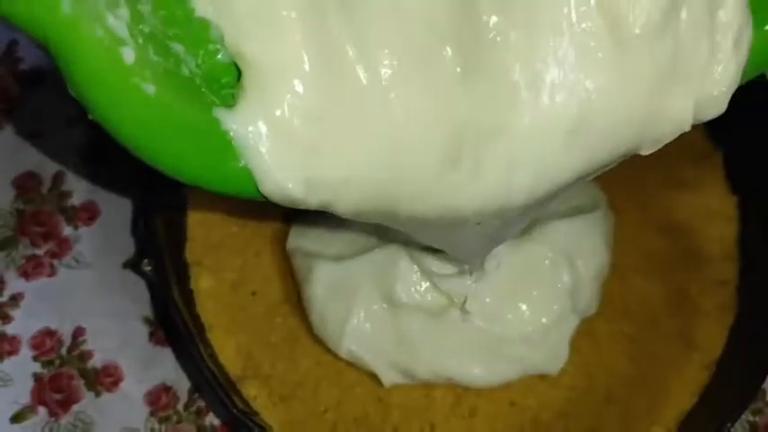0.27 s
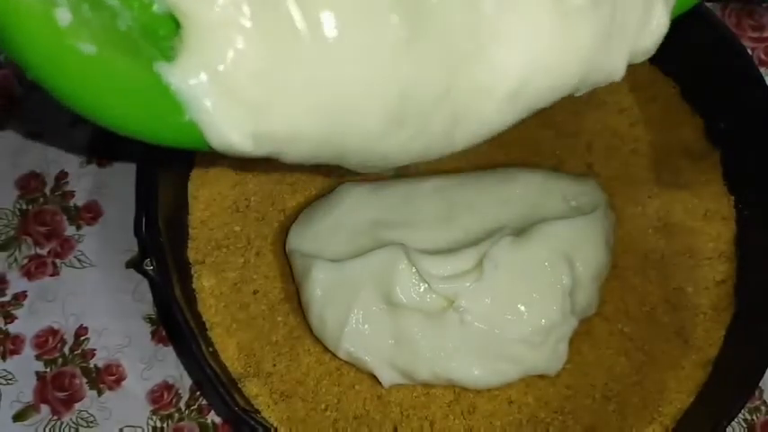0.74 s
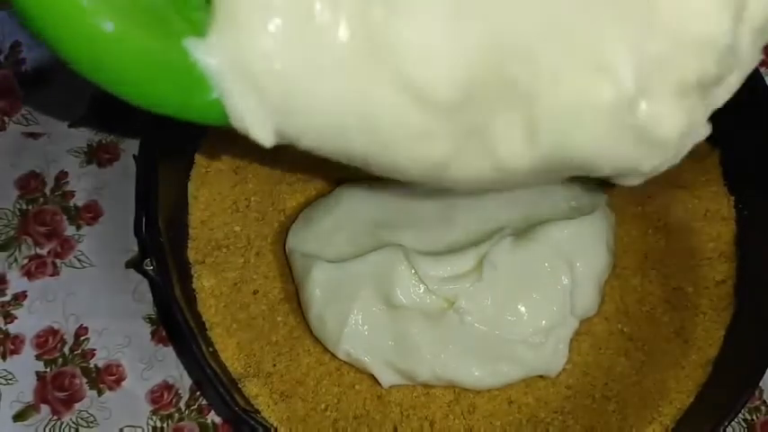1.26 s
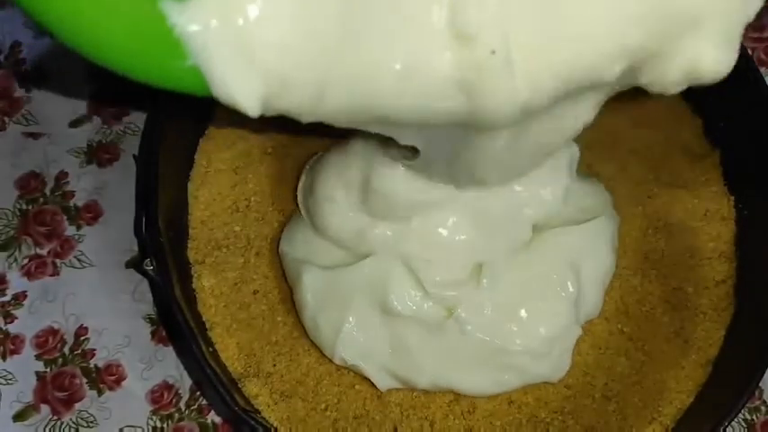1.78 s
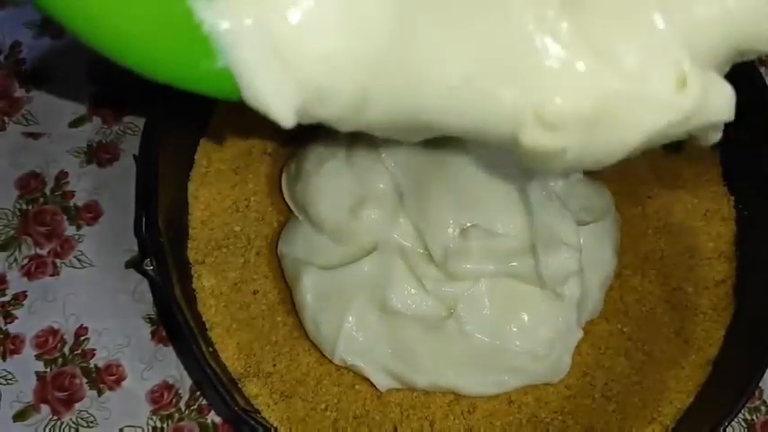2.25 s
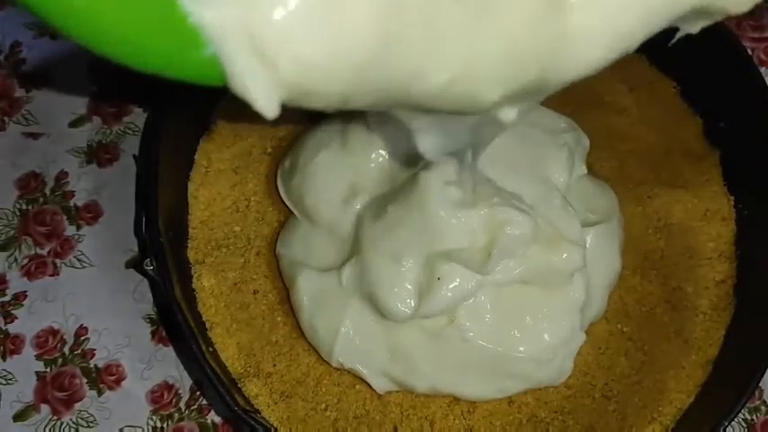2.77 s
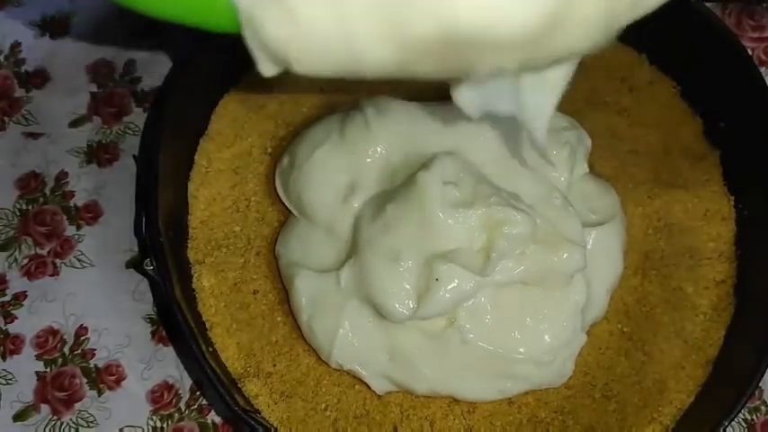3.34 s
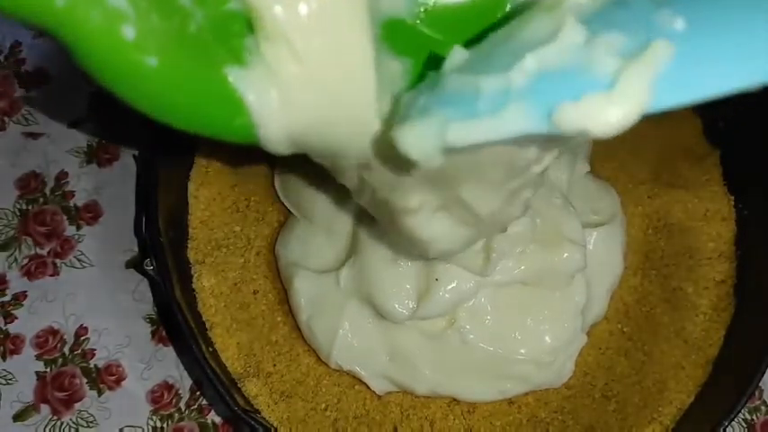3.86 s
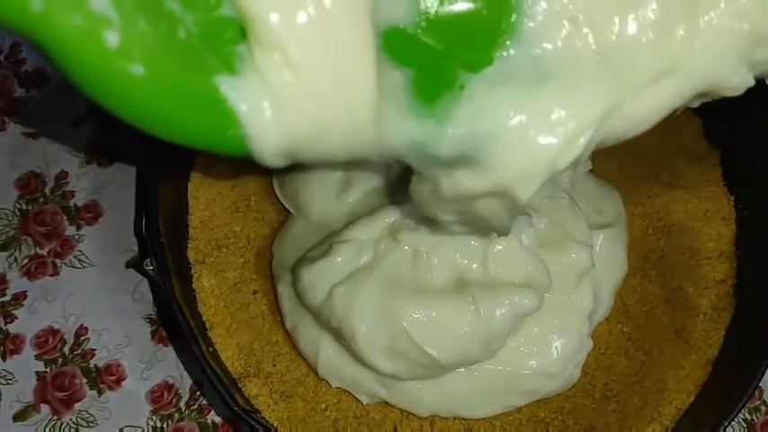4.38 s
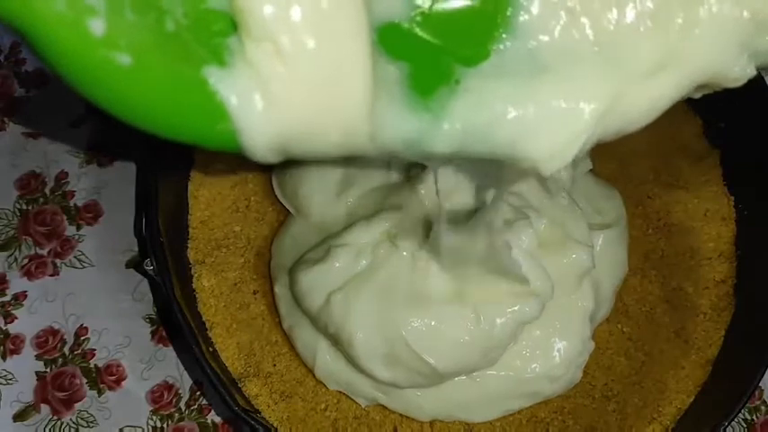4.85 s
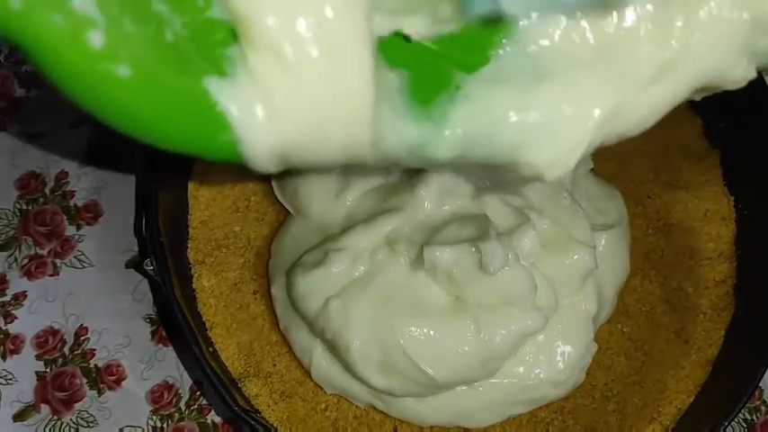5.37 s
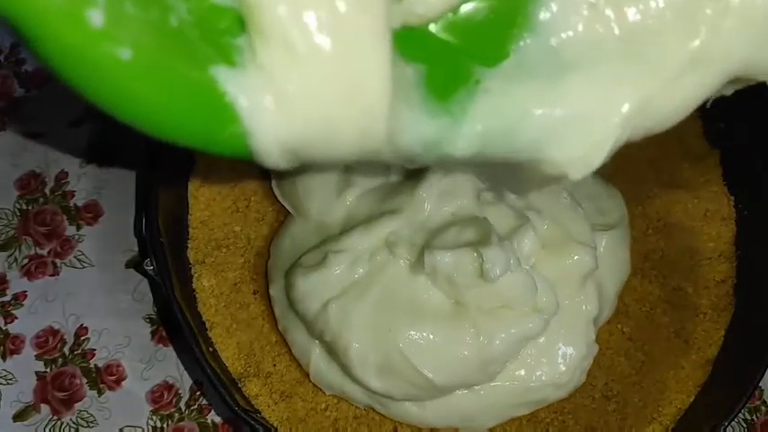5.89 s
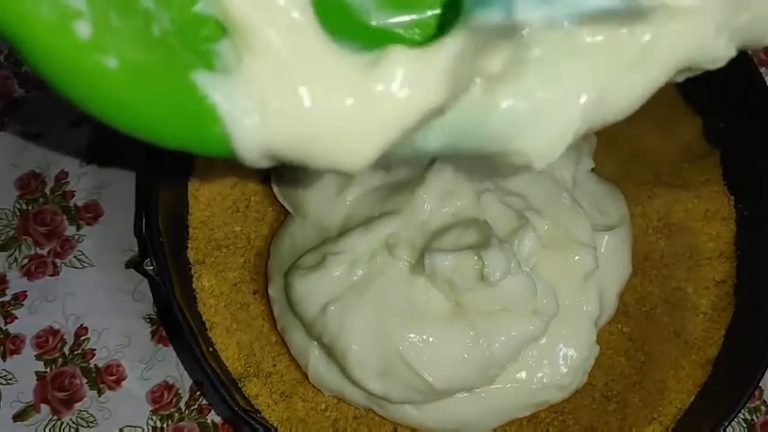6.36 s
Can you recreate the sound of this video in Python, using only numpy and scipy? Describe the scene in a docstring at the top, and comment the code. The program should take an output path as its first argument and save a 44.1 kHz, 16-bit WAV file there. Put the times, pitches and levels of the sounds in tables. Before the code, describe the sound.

Close up in a small, quiet kitchen, thick cream falls into a pan. From 0.1 to 0.9 seconds there is a busy cluster: low and mid hollow pops, wet smacks, soft pan thumps, foam crackle and many crisp, high bubble snaps; a soft bowl knock lands near 0.4. A lull follows, with one small squelch near 1.2. At 1.45 comes the loudest, roundest gloop, then sticky squelching and plops to about 2. More plops and airy squelches come at 2.3 to 2.95, strongest at 2.5. About a second of near quiet follows. A deep plop at 4.0 leads to a dense squelchy cluster at 4.4 to 4.7. Weak soft pops come at 5.2 to 5.6, then a faint knock at 6.2 and a sharp, bright wet snap at 6.5. Dull rubbing, low hum, rumble and a barely audible tick each second lie behind.

```python
"""Thick whipped cream is pushed from a plastic bowl with a silicone spatula and drops into a cake pan.
Close to the microphone, wet smacks and ringing air pockets are pulses over soft resonant pan thumps.
Folding cream squeezes out air as filtered noise and clicks; bubbles and foam are short high rings and crackle.
The spatula rubs and the bowl knocks softly. Behind, a small kitchen hums and rumbles in shaped noise,
and something ticks faintly once a second, like a wall clock."""
import sys
import numpy as np
from scipy import signal
from scipy.io import wavfile

SR = 44100
rng = np.random.default_rng(int(sys.argv[2]) if len(sys.argv) > 2 else 0)


def put_to_file(sound):
    """Save the sound as 16-bit audio at rate SR, in the file named by the first command-line argument."""
    columns = np.atleast_2d(sound).T  # one column per channel
    safe = np.clip(columns, -1, 1)
    whole_steps = np.round(safe * 32767)
    wavfile.write(sys.argv[1], SR, whole_steps.astype(np.int16))


N = 291942

# spectrum of wet hiss from tearing films: f/Hz, level/dB
WET_HISS = [(300, -46), (900, -1), (1200, -8), (1550, 3.5), (2000, -4), (2550, 1), (3400, -5), (4800, -5.5),
            (6300, -2.5), (7500, 5.5), (8700, 4), (9600, -7), (10600, -20.5), (15000, -27.5)]
# spectrum of wet surfaces meeting: f/Hz, level/dB
WET_SMACK = [(200, 11), (900, 4.5), (1200, -8.5), (1520, 3), (2000, -8.5), (2600, -11), (4000, -19.5),
             (8500, -17.5), (11000, -38.5)]


def amp(db):
    """Decibels to gain."""
    return 10 ** (np.asarray(db) / 20)


def unit(x):
    """Scales to an rms of one."""
    return x / np.sqrt(np.mean(x ** 2) + 1e-20)


def read(points, hz):
    """Reads a table of (f/Hz, value) on a log-frequency axis."""
    f, value = np.transpose(points)
    return np.interp(np.log(hz + 1), np.log(f), value)


def follow(curve):
    """Turns a table of (t/s, level/dB) into a gain for every sample."""
    return amp(np.interp(np.arange(N) / SR, *np.transpose(curve)))


def add(mix, s, sound):
    """Mixes a sound in at a time in seconds."""
    part = mix[max(round(s * SR), 0):][:len(sound)]
    part += sound[:len(part)]


def colour(x, points):
    """Causal, minimum-phase filter with the given spectrum."""
    size = 8192
    log_gain = np.log(amp(read(points, abs(np.fft.fftfreq(size, 1 / SR)))))
    # the Hilbert transform of the log gain supplies the phase
    spectrum = np.exp(np.conj(signal.hilbert(log_gain)))
    taps = np.fft.ifft(spectrum).real[:size // 2]
    return signal.oaconvolve(x, taps)[:len(x)]


def resonate(x, hz, width_hz):
    """One resonance with a gain of one at its peak."""
    return signal.lfilter(*signal.iirpeak(hz, hz / width_hz, SR), x)


def resonate_twice(x, hz, width_hz):
    """The same resonance in two passes, for steeper skirts."""
    return resonate(resonate(x, hz, width_hz), hz, width_hz)


def swing(t, hz, rise):
    """A softly pushed vibration: it swells for the rise time and dies away."""
    envelope = (t / rise * np.exp(1 - t / rise)) ** 2
    return envelope * np.sin(2 * np.pi * hz * t)


def crackle(per_s, spread_db):
    """Random clicks, a few much larger than the rest."""
    size = amp(spread_db * np.minimum(rng.exponential(1, N), 4))
    signed = size * rng.choice([-1, 1], N)
    return unit(signed * (rng.random(N) < per_s / SR))


def pings(pitches, per_s, cycles):
    """Random small bubbles, each ringing for a few cycles at one of the pitches."""
    t = np.arange(SR // 50) / SR
    total = np.zeros(N)
    for hz in pitches:
        ring = swing(t, hz, cycles / hz)
        total += signal.oaconvolve(crackle(per_s, spread_db=2.5), ring)[:N]
    return unit(total)


def plops():
    """A wet smack, then the trapped air rings for a few cycles; the weight of the dollop moves the pan."""
    # dollops landing and pockets popping, relative levels:
    # t/s, pop level/dB, pocket pitch f/Hz, pan thump level/dB, wet smack level/dB
    landings = [(0.098, -36, 274, -48, -47.5), (0.1493, -37.5, 320, -47.5, -41),
                (0.197, -29.5, 728, -49.5, -47.5), (0.418, -28.5, 776, -63, -45.5),
                (0.648, -50, 784, -78, -51), (0.707, -47, 432, -58, -70), (0.842, -51, 730, -73, -54.5),
                (0.864, -49, 650, -64, -78), (1.4515, -20, 370, -41.5, -39), (1.5639, -40, 617, -46, -42),
                (1.796, -30.5, 740, -45, -35.5), (1.825, -42, 335, -43, -74), (2.297, -36, 342, -44, -60),
                (2.511, -28, 674, -40.5, -36), (2.882, -47, 670, -56, -67), (2.938, -38.5, 435, -63, -49),
                (3.969, -29.5, 407, -42, -57.5), (4.148, -54, 716, -75, -46.5), (4.467, -48, 664, -66, -47),
                (4.507, -29.5, 740, -56, -58), (4.5394, -31, 396, -44, -39.5),
                (4.733, -49, 846, -75, -49.5), (5.192, -42, 232, -49.5, -57), (5.204, -51, 427, -54, -44.5),
                (5.311, -40, 258, -45, -51), (5.598, -44.5, 760, -63, -48), (6.415, -51.5, 974, -74, -56),
                (6.528, -34.5, 754, -53.5, -37)]
    # partials of an air pocket: multiple of its pitch, level/dB
    pocket_partials = [(1.002, 2.5), (1.62, -3), (2.62, -9)]
    # spectrum of the pocket rings, fullest below 1 kHz, falling steeply above: f/Hz, level/dB
    pop_spectrum = [(30, 11), (380, 0.5), (490, -6), (600, 1), (800, -0.5), (1030, -2), (1200, -62),
                    (1550, -32), (2000, -29), (5000, -42), (16000, -66)]
    # resonances of the loaded pan: f/Hz, level/dB, time to full swing/s
    pan_modes = [(74.3, -2, 0.0092), (115.1, -4, 0.015), (150.2, 3, 0.015), (208.5, -3.5, 0.0088),
                 (308, 0.5, 0.0047), (378.8, -13, 0.017)]
    # a pocket of this pitch takes swing_s to full swing; higher ones get there sooner by the power
    pocket_hz, swing_s, swing_power = 402, 0.0027, 0.46

    t = np.arange(SR // 5) / SR
    pops, thumps, smacks = np.zeros((3, N))
    thump = sum(amp(db) * swing(t, hz, rise) for hz, db, rise in pan_modes)
    for s, pop_db, hz, thump_db, smack_db in landings:
        rise = swing_s * (pocket_hz / hz) ** swing_power
        pop = sum(amp(db) * swing(t, hz * k, rise) for k, db in pocket_partials)
        smack = unit(colour(rng.standard_normal(len(t)), WET_SMACK)) * np.exp(-t / 0.0065)
        add(pops, s, amp(pop_db) * pop)
        add(thumps, s + 0.0034, amp(thump_db) * thump)  # the pan answers 3.4 ms later
        add(smacks, s, amp(smack_db) * smack)
    return echoed(amp(-2.0) * colour(pops, pop_spectrum) + smacks) + amp(-0.5) * thumps


def airflow(swell):
    """Air from one fold: it builds as the cream presses, comes to a sharp peak, then dies as the fold closes."""
    swell_db, close_db = 22, 22
    close = 0.011 + 0.48 * swell  # closing time in s, longer after a longer swell
    open_s, roundness = 0.0058, 1.01  # time to crack open; shape of the peak (1 = pointed)
    t = np.arange(0, swell + 2 * close, 1 / SR)
    building = swell_db * abs(1 - t / swell) ** roundness
    closing = close_db * abs((t - swell) / close) ** roundness
    drop = np.where(t < swell, building, closing)
    return amp(-drop) * np.minimum(t / open_s, 1)


def squelches():
    """Escaping air swells, tears wet films and blows across the gap until the fold closes."""
    # air squeezed from between folds: t/s of strongest flow, swell/s, hollow tone level/dB, wet hiss level/dB
    folds = [(0.158, 0.029, -47, -51), (0.403, 0.14, -59.5, -59), (0.71, 0.018, -48, -55),
             (0.772, 0.035, -64, -59.5), (1.174, 0.018, -58, -62), (1.626, 0.085, -49.5, -64.5),
             (1.727, 0.019, -50, -69), (1.775, 0.059, -40.5, -46.5), (1.866, .006, -56, -71),
             (1.956, 0.13, -51.5, -61), (2.464, 0.055, -49, -68.5), (2.497, 0.043, -52.5, -54.5),
             (2.702, 0.14, -68, -66), (2.894, 0.042, -58.5, -81), (2.943, 0.068, -61.5, -64),
             (4.184, 0.1, -62, -75), (4.43, .01, -56, -69), (4.508, 0.076, -42, -50.5),
             (4.538, 0.018, -37, -44.5), (4.64, 0.051, -54.5, -63), (4.694, 0.074, -59, -62.5),
             (4.906, 0.079, -59, -80), (5.209, .022, -49, -65.5), (5.273, 0.14, -64, -68),
             (6.526, 0.012, -43, -38.5)]
    # the gap between folds rings hollow: f/Hz, half the width of each filter pass/Hz, level/dB
    gap_modes = [(653, 115, 6.5), (754, 70, 4), (877, 46, -8.5), (1553, 135, -7), (2070, 340, -10.5),
                 (2250, 250, -41.5)]
    gurgle_db, bubbling_db = -8, -13.5  # small pockets and bubbles, against the flow

    t = np.arange(N) / SR
    blow, tear = np.zeros((2, N))
    for peak, swell, hollow_db, hiss_db in folds:
        flow = airflow(swell)
        add(blow, peak - swell, amp(hollow_db) * flow)
        add(tear, peak - swell, amp(hiss_db) * flow)

    # the sticky film gives way in little spurts, each sudden and then fading
    fade = np.exp(-t[:SR // 20] / 0.0051)
    slips = signal.oaconvolve(abs(crackle(per_s=200, spread_db=3)), fade)[:N]
    spurts = unit(0.3 + unit(slips))
    air = spurts * rng.standard_normal(N)
    hollow = unit(sum(amp(db) * resonate_twice(air, hz, 2 * width) for hz, width, db in gap_modes))
    tearing = crackle(per_s=6000, spread_db=1) + 0.4 * rng.standard_normal(N)
    films = unit(colour(spurts * tearing, WET_HISS))

    # where air and wet film meet, small bubbles form and break
    bubbling = pings(np.arange(1500, 3200, 140), per_s=35, cycles=2)
    gurgle = pings(np.arange(620, 900, 40), per_s=20, cycles=2)
    blown = blow * (hollow + amp(gurgle_db) * gurgle)
    return blown + tear * films + amp(bubbling_db) * np.sqrt(blow * tear) * bubbling


def bubbles():
    """Each bursting film gives a broad snap and a very short, rough ring that rises as the hole opens."""
    # larger bubbles bursting: t/s, relative level/dB, nominal ring f/Hz, snap level/dB against the ring
    bursts = [(0.2964, -35.5, 7300, -31), (0.3306, -38.5, 7400, -6), (0.3945, -31, 8520, -27),
              (0.4324, -35.5, 8050, -13), (0.442, -33, 7800, -28), (0.5856, -38, 8620, -8.5),
              (0.595, -31.5, 8400, -11.5), (0.694, -38.5, 7700, -6), (0.7198, -38, 7660, -23),
              (0.7646, -47, 6560, 4), (0.84, -49, 8000, 1), (1.106, -45.5, 8700, -7.5),
              (2.0786, -45, 7300, -27), (2.4963, -37.5, 8390, 3), (2.5023, -36.5, 8300, 5.5),
              (2.602, -45.5, 7800, -5.5), (2.687, -42, 7430, -13), (2.934, -44.5, 7470, -26),
              (2.955, -46, 7500, -10), (4.423, -48.5, 9100, 2), (4.5396, -42.5, 7300, 6.5),
              (5.313, -48, 7260, -3), (5.425, -59, 8900, 5), (6.5252, -25, 7470, -7)]

    t = np.arange(SR // 40) / SR
    rings, snaps = np.zeros((2, N))
    for s, db, hz, snap_db in bursts:
        turns = np.cumsum(hz * (1 + 0.023 * (0.5 - np.exp(-t / 0.0013)))) / SR
        roughness = unit(resonate_twice(rng.standard_normal(len(t)), hz, 2900))
        ring = np.sin(2 * np.pi * turns) + 0.28 * roughness
        ring_envelope = (1 - np.exp(-t / 0.00047)) * np.exp(-t / 0.0011)
        add(rings, s + 0.00044, amp(db) * ring * ring_envelope)
        snap_envelope = (1 - np.exp(-t / 0.00051)) * np.exp(-t / 0.0019)
        snap = rng.standard_normal(len(t)) * snap_envelope
        add(snaps, s + 0.00052, amp(db + snap_db) * snap)
    return amp(-0.5) * rings + amp(3.5) * colour(snaps, WET_HISS)


def foam():
    """Countless tiny bubbles break as the cream stretches, each with its own brief ping; a few larger ones smack."""
    # foam crackling as it stretches: t/s, relative level/dB
    stretching = [(0.0, -85), (0.11, -66), (0.28, -76), (0.51, -76.5), (1.53, -82.5), (1.9, -73.5),
                  (3.87, -91.5), (4.39, -86.5), (4.57, -81), (4.77, -90), (6.38, -87.5), (6.62, -77.5)]

    tiny = pings(np.arange(7200, 9000, 200), per_s=9, cycles=3)
    fizz = unit(colour(crackle(per_s=1600, spread_db=1.0), WET_HISS))
    smacks = unit(colour(crackle(per_s=60, spread_db=3), WET_SMACK))
    breaking = amp(-0.5) * tiny + amp(-1.5) * fizz + amp(-5.5) * smacks
    return amp(1.5) * follow(stretching) * breaking


def spatula():
    """Soft, uneven rubbing through the cream in the bowl: random clicks dulled by the cream."""
    # strength of the rubbing: t/s, relative level/dB
    rubbing = [(0.0, -59.5), (1.22, -72.5), (1.68, -60), (2.06, -70.5), (2.49, -69.5), (2.93, -68),
               (4.48, -69.5), (4.59, -69), (4.92, -70), (5.73, -64), (6.09, -71), (6.62, -68.5)]
    # its dull spectrum: f/Hz, level/dB
    rub_spectrum = [(100, -33), (220, -0.5), (320, -1.5), (400, -3), (520, -2), (750, -10), (1100, -18.5),
                    (3000, -29), (12000, -47)]

    rub = unit(colour(crackle(per_s=900, spread_db=2), rub_spectrum))
    return amp(-2.5) * follow(rubbing) * rub


def bumps():
    """Soft, deep knocks as the heavy bowl shifts in the hand, each a short swing at a low pitch."""
    # knocks of the bowl: t/s, level/dB, f/Hz, time to full swing/s
    knocks = [(0.423, -39.5, 75.6, 0.0027), (5.315, -54, 27.2, 0.03), (6.209, -48.5, 91, 0.0063)]

    t, out = np.arange(SR // 3) / SR, np.zeros(N)
    for s, db, hz, rise in knocks:
        add(out, s, amp(db) * swing(t, hz, rise))
    return out


def clock():
    """A faint, far tick each second: a noise burst with a softened onset and a smeared decay."""
    # f/Hz, level/dB
    tick_spectrum = [(1000, -17), (2000, -4.5), (5000, -8.5), (6800, 1.0), (8500, -12.5), (10500, -26)]
    t, out = np.arange(SR // 4) / SR, np.zeros(N)
    envelope = (1 - np.exp(-t / 0.0047)) * np.exp(-t / 0.027)
    for second in range(7):
        tick = unit(colour(rng.standard_normal(len(t)), tick_spectrum))
        add(out, second + 0.275, amp(-65.5) * tick * envelope)
    return out


def kitchen():
    """Steady room noise, a wavering low hum and a deep rumble, the last two from narrowly resonant noise."""
    # spectrum of the room noise: f/Hz, level/dB
    room_noise = [(12, -41), (20, 11.5), (37, -4), (93, -10.5), (141, -15.5), (164, 1.5), (299, -16),
                  (516, -20.5), (846, -30.5), (1160, -30), (4240, -38.5), (6110, -37.5), (7520, -34.5),
                  (9020, -37.5), (10000, -47), (13000, -44.5), (22000, -120)]

    air = unit(colour(rng.standard_normal(N), room_noise))
    hum = unit(resonate_twice(rng.standard_normal(N), 154.4, 22))
    rumble = unit(resonate_twice(rng.standard_normal(N), 25, 4.2))
    return amp(-63) * air + amp(-66.5) * hum + amp(-70.5) * rumble


def echoed(x):
    """Adds the first echoes from the surfaces nearby as delayed, quieter copies."""
    # echoes from the pan wall, bowl and table: delay t/s, level/dB
    nearby = [(.0042, -33), (.0083, -14.5), (0.0143, -26.5), (.0185, -32)]

    out = x.copy()
    for delay, db in nearby:
        add(out, delay, amp(db) * x)
    return out


def room(x):
    """Sparse reflections, each band dying at its own speed."""
    # time for the reflections to fall by 60 dB: f/Hz, t/s
    decay_times = [(100, 0.7), (500, 0.2), (2000, 0.22), (8000, 0.18)]

    taps = rng.choice([-1., 1.], SR // 2) * (rng.random(SR // 2) < 3000 / SR)
    taps[:round(0.008 * SR)] = 0  # no reflections in the first 8 ms
    hz, t, bands = signal.stft(taps, SR, nperseg=256)
    decay = amp(-60 * t / read(decay_times, hz)[:, None])
    tail = signal.istft(bands * decay, SR, nperseg=256)[1]
    return signal.fftconvolve(x, tail / np.linalg.norm(tail))[:N]


def scene():
    """The cream close by, the kitchen behind."""
    low = plops() + bumps() + spatula()
    wet = squelches() + bubbles() + foam()
    reflections = room(amp(-19.5) * low + amp(-26.5) * wet)
    return (low + wet + reflections + clock() + kitchen())[None]


def record(dry):
    """The recorder's band limit: a low-pass at 15.5 kHz."""
    taps = signal.firwin(511, 15500, window=("kaiser", 9), fs=SR)
    return signal.oaconvolve(dry, taps[None], "same")


dry = scene()
out = record(dry)
put_to_file(out)
```